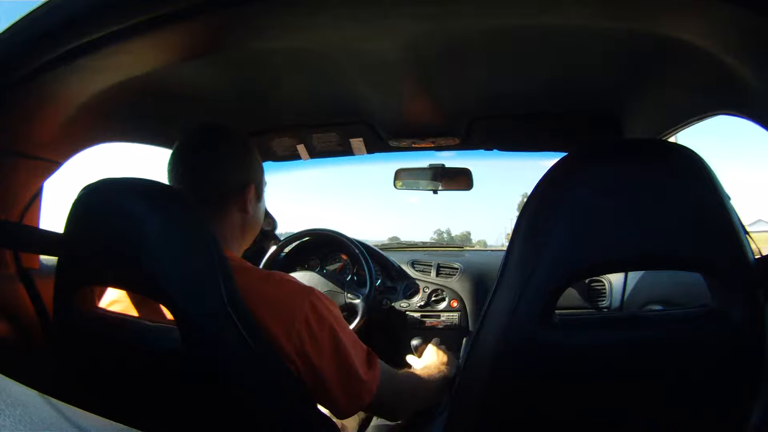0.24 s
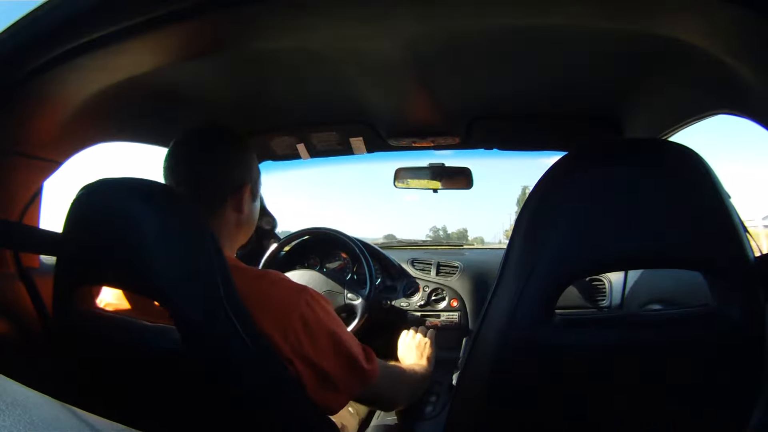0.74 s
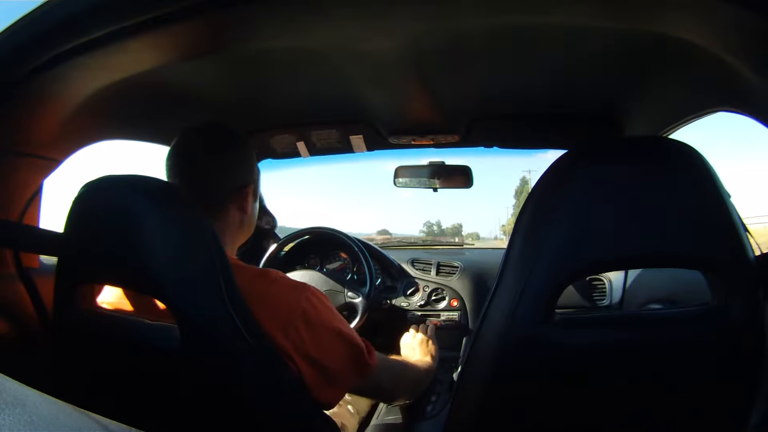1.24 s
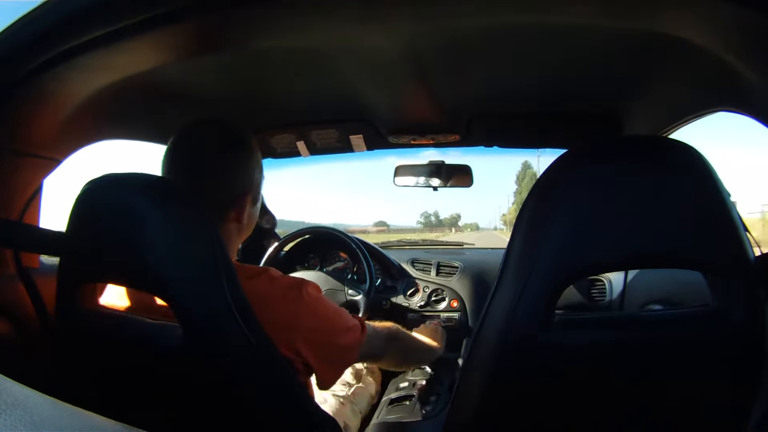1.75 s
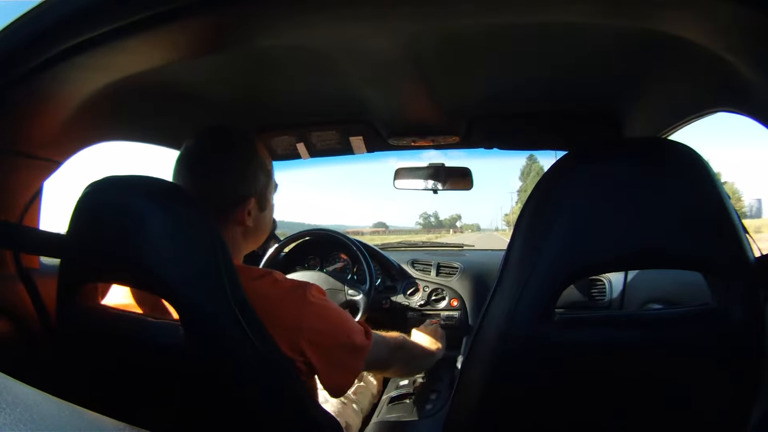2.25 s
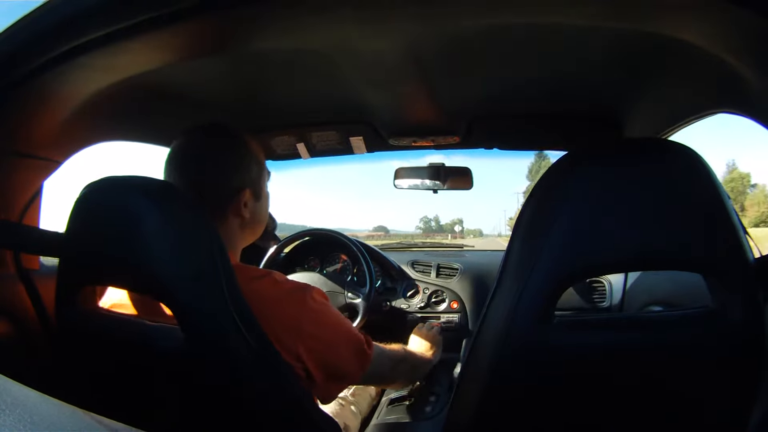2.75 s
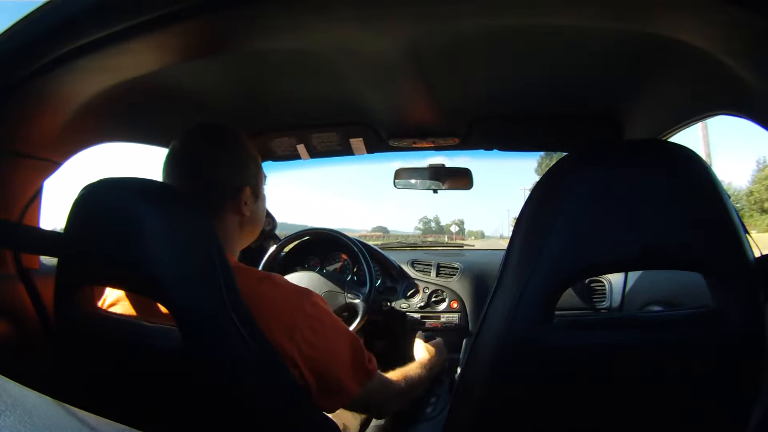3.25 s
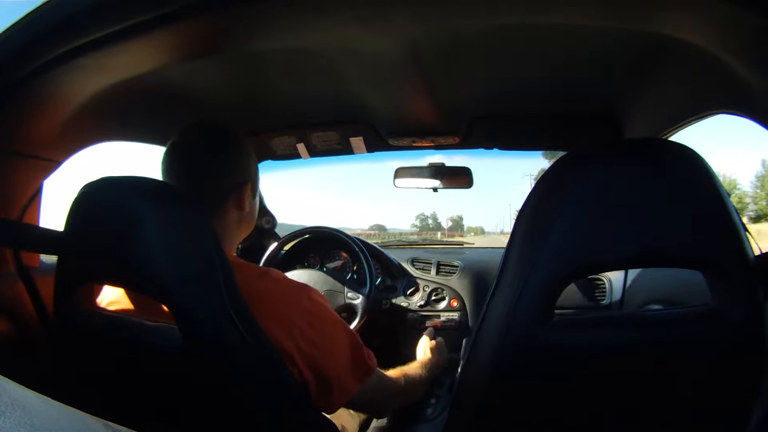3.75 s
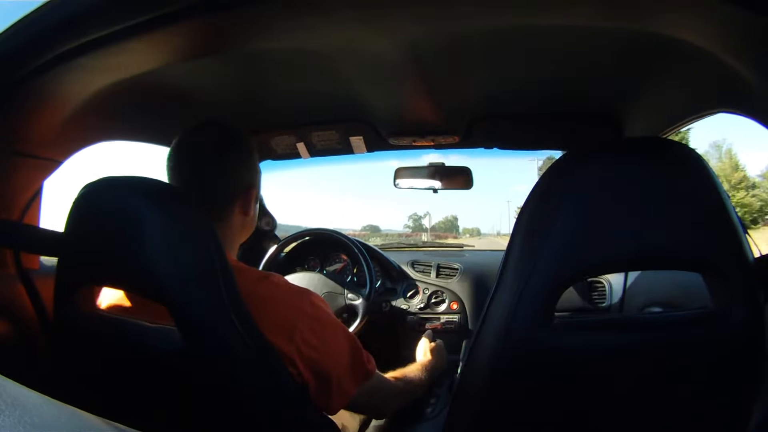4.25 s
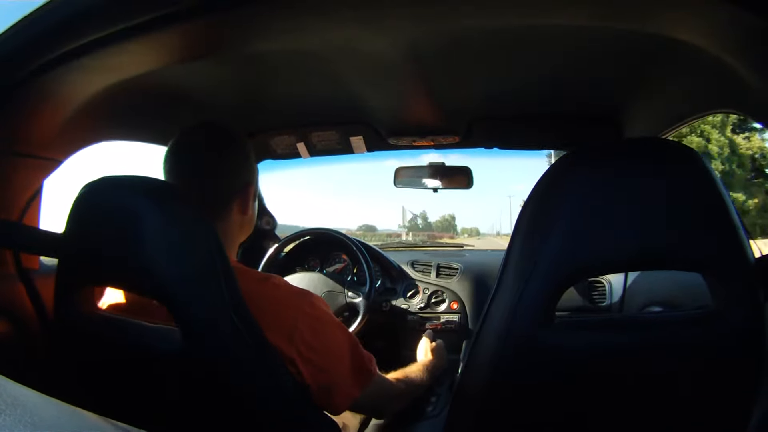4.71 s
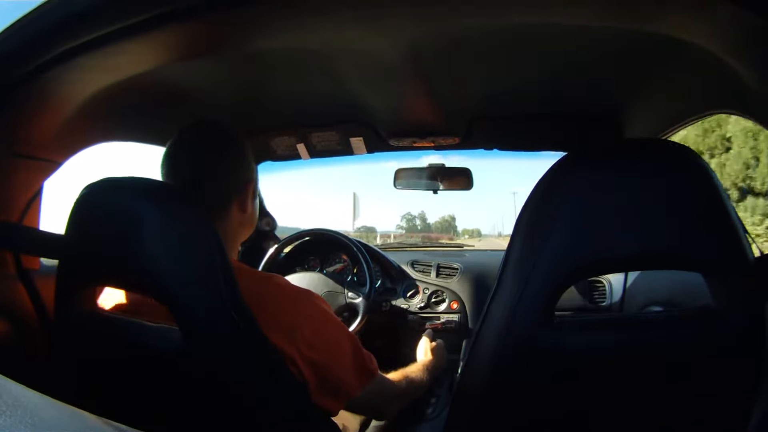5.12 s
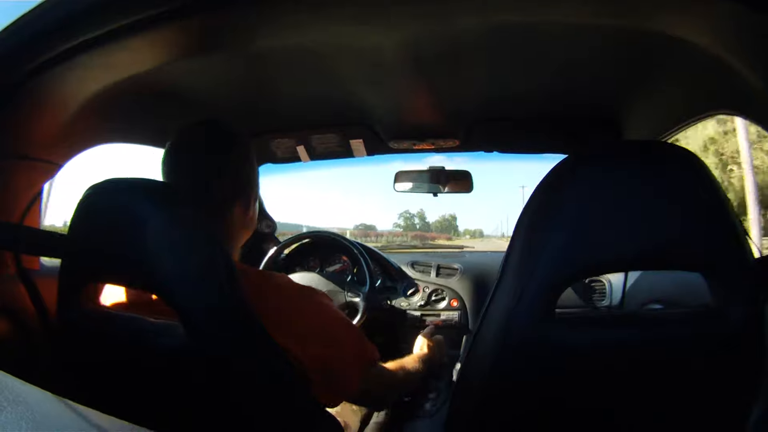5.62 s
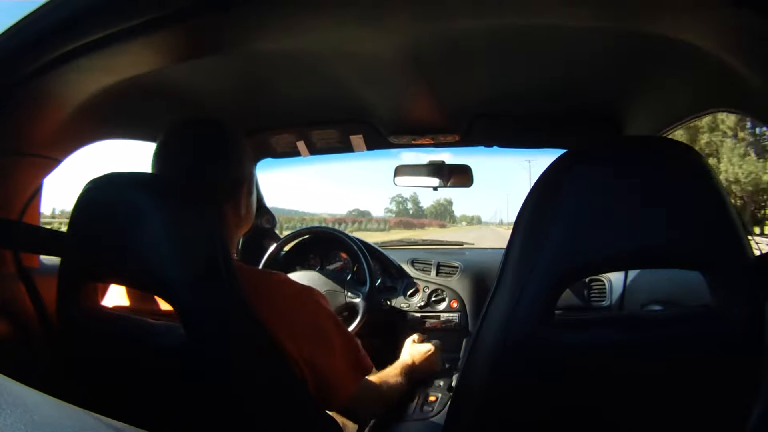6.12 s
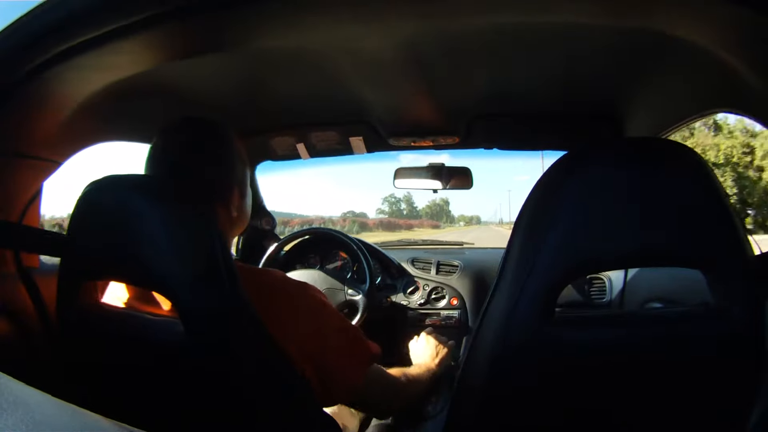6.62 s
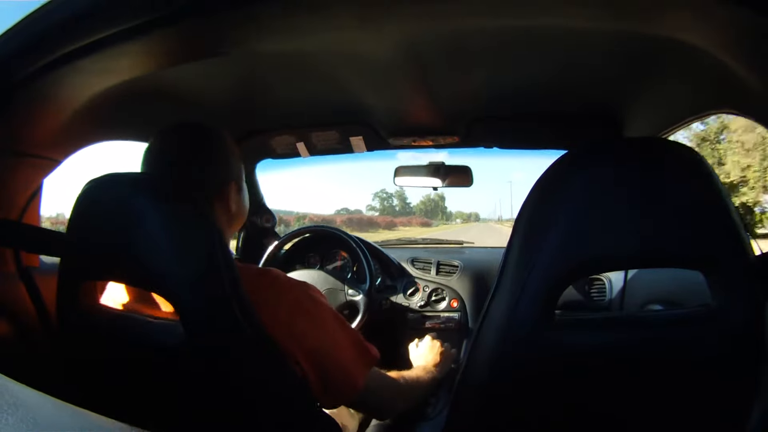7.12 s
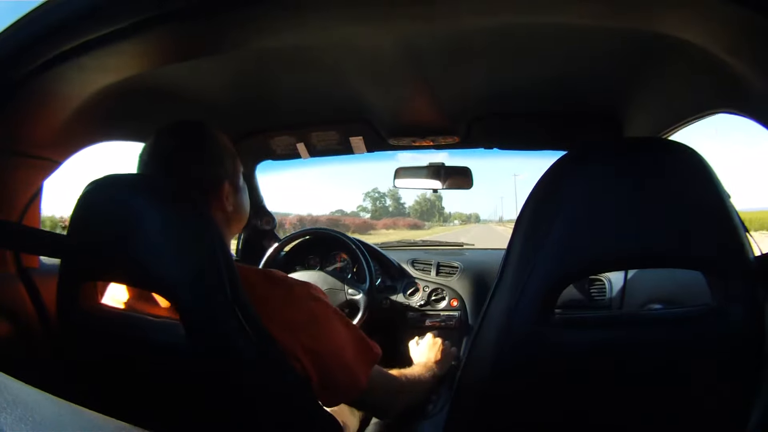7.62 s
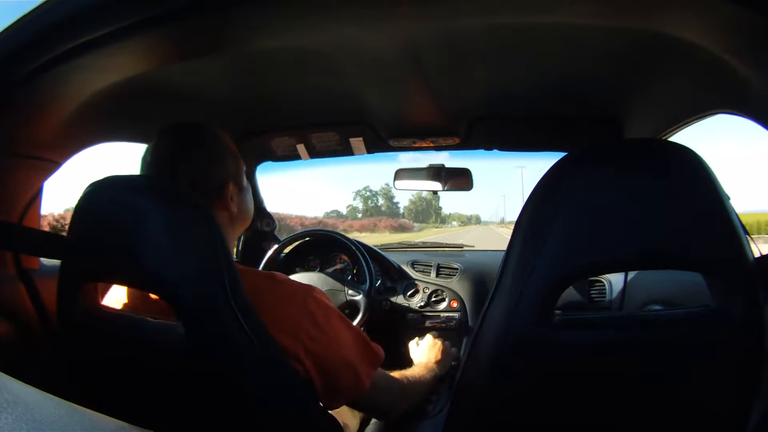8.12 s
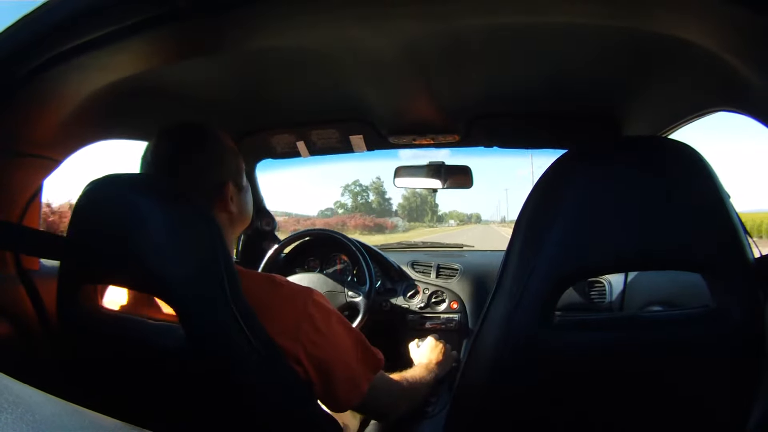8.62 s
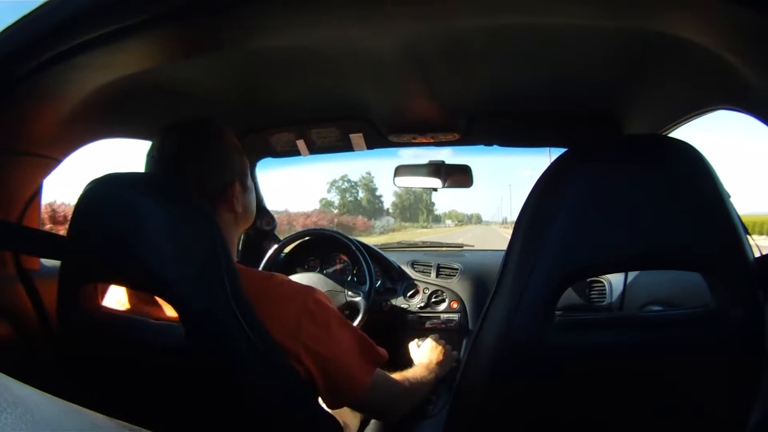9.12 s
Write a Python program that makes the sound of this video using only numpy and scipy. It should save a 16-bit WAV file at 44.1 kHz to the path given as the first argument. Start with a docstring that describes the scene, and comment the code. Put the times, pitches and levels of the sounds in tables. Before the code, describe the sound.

A turbocharged sports car accelerates through two gears and coasts, heard inside, with wind buffeting making everything throb.

```python
"""Inside a car, behind the seats: a turbocharged two-rotor engine pulls through two gears and coasts.
Exhaust pulses drive the resonances of the cabin, gas and turbo hiss, the road rumbles and trim ticks.
Air passing the open windows buffets the cabin so hard that the capsule of a small camera's microphone
responds nonlinearly, and every other sound throbs at the rate of the buffeting."""
import sys
import numpy as np
from scipy import signal
from scipy.fft import rfft, irfft, next_fast_len
from scipy.io import wavfile
from scipy.ndimage import uniform_filter1d

SR = 44100
rng = np.random.default_rng(int(sys.argv[2]) if len(sys.argv) > 2 else 0)


def master_out(mix):
    """Clip the mix to full scale and print it as 16-bit PCM to the path in sys.argv[1]."""
    frames = np.transpose(np.atleast_2d(mix))
    ceiling = np.clip(frames, -1, 1)
    pcm = np.round(ceiling * 32767).astype(np.int16)
    wavfile.write(sys.argv[1], SR, pcm)


N = 412776

# Spectra of road noise, turbo hiss and exhaust gas. Each row: frequency in Hz, relative density in dB.
ROAD_SPECTRUM = [(30, 31.5), (45, 19.5), (70, 9), (110, -0.5), (170, -4), (300, 3.5), (420, -3.5),
                 (700, -7.5), (1100, -8), (1600, -14), (2200, -25), (3200, -43), (5000, -44.5), (9000, -55),
                 (13000, -69.5)]
HISS_SPECTRUM = [(1500, -24), (2200, 2.5), (3000, -4), (4000, -9), (5000, -11.5), (5900, -7.5), (7000, -12),
                 (8500, -11.5), (10000, -17.5), (12000, -21.5), (14000, -25.5), (15500, -37)]
GAS_SPECTRUM = [(90, -23), (150, -15.5), (300, -4.5), (600, 10.5), (1000, 0), (1600, 7), (2200, -7.5),
                (3200, -21.5)]
# Road and wind noise. Each row: time in seconds, level above the low cut in dB.
ROAD_LEVEL = [(0, -29.5), (1.6, -38), (2.3, -45), (3.5, -30.5), (5, -26.5), (5.8, -33.5), (6.2, -38),
              (7.25, -36), (7.6, -38), (8.6, -36.5), (9.36, -39.5)]
# A deep, wavering thrum. Each row: time in seconds, level at the capsule in dB.
THRUM_LEVEL = [(0, -21.5), (1.5, -7.5), (2.5, -13), (4.8, -11), (5.5, -4), (5.8, -12), (6.4, -2.5),
               (7.1, -9.5), (9.36, -9.5)]
# Gear lever and trim impacts. Each row: start in seconds, snap level in dB, knock level in dB.
TICK_EVENTS = [(1.4824, -39, -17.5), (1.6437, -43, -36), (1.7353, -54, -18), (2.1012, -46, -32),
               (2.1066, -62, -11.5), (2.149, -34, -26), (2.164, -50, -19), (2.1763, -58, -38),
               (5.904, -48, -32), (5.9307, -30, -13), (5.9847, -32, -21), (6.0207, -47, -24),
               (6.635, -56, -39), (6.674, -55, -17), (6.7338, -56, -12), (7.1584, -28, -10),
               (7.2212, -28, -12), (7.363, -57, -16), (7.3996, -63, -44), (7.5375, -55.5, -15),
               (7.7777, -55, -19), (7.7938, -68, -9), (8.4407, -56, -29), (8.744, -50, -25),
               (9.0186, -51, -20)]
# Modes of the plastic. Each row: frequency in Hz, time to decay by 60 dB in seconds, gain in dB.
PLASTIC_MODES = [(600, .010, -3), (1200, .005, 0), (1800, .004, -3), (2600, .003, 0), (3700, .0025, 0),
                 (5400, .002, -4), (7500, .002, -10)]
# Compressor speed. Each row: time in seconds, blade-passing frequency in Hz.
BLADE_RATE = [(0, 11250), (.72, 12260), (1.15, 13120), (1.49, 13890), (1.82, 9450), (1.95, 8400),
              (2.08, 7750), (2.25, 7355), (2.36, 7320), (2.68, 9680), (2.91, 10670), (3.28, 11275),
              (4.72, 12180), (5.69, 13210), (5.8, 11500), (6.0, 9335), (6.17, 8180), (6.44, 7470),
              (6.7, 7000)]
# The hiss that stays off throttle. Each row: time in seconds, level in dB.
DRAUGHT_LEVEL = [(1.55, -61), (1.75, -65.5), (1.95, -73), (2.45, -84), (5.8, -60.5), (6, -67), (7.6, -71),
                 (9.36, -72.5)]
# Swells of rumble under load. Each row: centre in seconds, half-width in seconds, peak level in dB.
RUMBLE_SWELLS = [(1.28, 0.14, -25), (3.3, 0.15, -42), (3.65, .04, -24.5), (4.3, 0.25, -43.5),
                 (5.6, 0.19, -30.5)]
# Window buffeting. Each row: central crest in seconds, length in seconds, frequency in Hz, peak in dB.
BUFFET_BOUTS = [(1.062, 0.91, 17.5, 4.5), (1.451, 0.23, 19.1, 12.5), (1.805, 0.47, 20, 12.5),
                (2.305, 0.43, 18.6, 9), (2.726, .38, 19.3, 11), (3.134, 0.44, 20.1, 5.5),
                (3.665, 0.56, 20.7, 9.5), (3.971, .2, 16, 1.5), (4.318, .46, 21.36, 13.5),
                (4.807, .4, 21.4, 11.5), (5.259, 0.55, 22.3, 13), (5.633, 0.26, 16, 4.5),
                (6.005, .54, 23.2, 12.5), (6.581, 0.49, 23.4, 9.5), (7.145, .56, 21.6, 14),
                (7.742, .6, 22.3, 12), (8.297, 0.5, 21, 12), (8.783, .48, 21.8, 13),
                (9.192, .34, 21.8, 11.5)]
# Driving. Each row: clutch bite in seconds, foot lift in seconds, throttle from 0 to 1.
GEAR_SPANS = [(-1, 1.47, 1), (2.12, 5.675, 1), (6.35, 20, 0)]
# The exhaust gulps, murmurs and fades as the clutch opens. Each row: seconds after lifting, gain in dB.
LIFT_ENVELOPE = [(0, 2), (.04, -2), (.075, -30), (.12, -15.5), (.24, -12.5), (.4, -26)]
# Engine speed. Each row: time in seconds, shaft rotation frequency in Hz.
SHAFT_SPEED = [(0, 90.6), (.2, 94.5), (.58, 100.4), (1.05, 108.8), (1.34, 114.3), (1.49, 116.6), (1.6, 107),
               (1.7, 103.5), (2.12, 90), (2.285, 78), (2.37, 81), (2.5, 81.1), (2.79, 83.1), (3.26, 88.4),
               (3.8, 93.5), (4.63, 100.6), (5.7, 109.6), (5.78, 102.5), (5.95, 101), (6.3, 79), (6.5, 77),
               (9.36, 71.5)]
# Harmonics of the exhaust pulse. Each row: order (multiple of shaft speed), base level in dB.
EXHAUST_ORDERS = [(1, -1.5), (2, 1.5), (3, 2), (4, 11.5), (5, 8.5), (6, 14), (7, 8.5), (8, 7), (9, 0.5),
                  (10, 0.0), (11, -0.3), (12, -1.5), (13, -2), (14, -2.5), (15, -6.5), (16, -6.5),
                  (17, -13.5), (18, -18.5), (19, -13), (20, -13.5)]
# Pulse shape while the turbo spools up. Each row: time in seconds, then gains in dB for
# order 2, order 3, order 4, order 6 and the rasp (orders 9, 11, 13 and 17).
SPOOL_SHAPE = [(2.2, -11, 0, -3.5, 13, 0.1), (2.3, 7.5, -13.5, -15, 7, 8), (2.62, 3.5, -9, -16, 11, -1),
               (2.78, -12.5, 2, 2, 9.5, 3), (2.95, -9, 6, -0.5, 11.5, 12.5),
               (3.1, -3.5, 6.5, 2, -8.5, 10.5), (3.25, -1, 3, 1.5, -7.5, 2.5)]
# Cabin and pipe resonances. Each row: frequency in Hz, bandwidth in Hz, gain in dB.
CABIN_MODES = [(186.4, 25.3, -21), (230.3, 17.5, -23), (323.5, 56, -30), (386, 12, -68.5), (449, 33, -47),
               (519.4, 15, -37.5), (565.5, 45, -39.5), (627, 14, -42.5), (701.5, 24.6, -41),
               (796, 25, -59.5), (821.4, 38, -41), (890.4, 31, -37.5), (996.6, 24.4, -30),
               (1039, 19, -34.5), (1119, 18, -41), (1204, 60, -39), (1465.5, 27, -33.5), (1497, 18, -43),
               (1735, 19, -38.5), (1860, 21, -60), (1901, 20, -37.5), (2030, 79, -48)]
# Dead spots of the cabin at the capsule. Each row: frequency in Hz, bandwidth in Hz.
CABIN_NULLS = [(663.5, 24), (414.4, 25)]

FULL_BOOST_HZ, STALL_HZ = 11410, 7300  # blade rates: the engine weakens below one, the whistle the other
LOW_CUT_HZ, TOP_CUT_HZ = 130, 15200


def undb(db):
    """Amplitude ratio of a level in dB."""
    return 10 ** (np.asarray(db) / 20)


def curves(table):
    """Linear interpolation in time: each later column as one value per sample."""
    times, *columns = np.transpose(table)
    return [np.interp(np.arange(N) / SR, times, column) for column in columns]


def walk(rate_hz):
    """Slow random fluctuation of unit deviation: held values, smoothed twice."""
    hold = int(SR / rate_hz)
    steps = np.repeat(rng.standard_normal(N // hold + 1), hold)
    smooth = uniform_filter1d(uniform_filter1d(steps, hold), hold)[:N]
    return smooth / smooth.std()


def noise(spectrum):
    """Spectral shaping of white noise, scaled to rms 1."""
    size = next_fast_len(N)
    hz, db = np.transpose(spectrum)
    log_hz = np.log(np.arange(1, size // 2 + 2) * SR / size)
    gain = undb(np.interp(log_hz, np.log(hz), db, -80, -120))
    shaped = irfft(rfft(rng.standard_normal(size)) * gain, size)[:N]
    return shaped / shaped.std()


def ring(x, hz, width_hz):
    """Forced response of a damped resonator with unit gain at resonance."""
    return signal.lfilter(*signal.iirpeak(hz, hz / width_hz, fs=SR), x)


def low_cut(x):
    """Fourth-order high-pass filtering."""
    return signal.sosfilt(signal.butter(4, LOW_CUT_HZ, "high", fs=SR, output="sos"), x)


def road():
    """Transmission of tyre and wind noise through the shell; lows and highs flicker independently."""
    roar = noise(ROAD_SPECTRUM)
    low = signal.sosfilt(signal.butter(2, 400, fs=SR, output="sos"), roar)
    roar = low * undb(walk(25)) + (roar - low) * undb(1.9 * walk(60))
    return roar / low_cut(roar).std() * undb(curves(ROAD_LEVEL)[0])


def low_thrum():
    """Narrow-band noise: a deep, wavering thrum near 37 Hz."""
    band = ring(ring(rng.standard_normal(N), 37.4, 6.9), 37, 8.1)
    return band / band.std() * undb(curves(THRUM_LEVEL)[0])


def trim_ticks():
    """Damped free vibration of struck plastic: a dull knock and a bright snap that bounce twice."""
    bounce_s, bounce_db = .004, -8
    out, t = np.zeros(N + 4000), np.arange(1000) / SR
    scatter = rng.standard_normal((len(TICK_EVENTS), 3, len(PLASTIC_MODES) + 1))
    # the contact takes a moment to build, longer for the knock
    knock, snap = ((1 - np.exp(-t / rise_s)) ** 2 for rise_s in (.0008, .0002))
    for (start, snap_db, knock_db), contacts in zip(TICK_EVENTS, scatter):
        for bounce, (late, *detunes) in enumerate(contacts):
            at = int((start + bounce * bounce_s * np.exp(0.38 * late)) * SR)
            for (hz, t60, db), detune in zip(PLASTIC_MODES, detunes):
                attack = undb(knock_db) * knock if hz < 2000 else undb(snap_db) * snap
                envelope = attack * undb(db + bounce * bounce_db - 60 * t / t60)
                out[at:at + len(t)] += envelope * np.sin(2 * np.pi * hz * (1 + 0.18 * detune) * t)
    return out[:N]


def buffet_crackle(pressure):
    """A Poisson process: random bright crackle, loudest in the troughs of the buffeting; rms 1."""
    clicks_per_s = 220
    clicks = (rng.random(N) < clicks_per_s / SR) * undb(3.2 * np.minimum(rng.exponential(size=N), 5))
    grains = ring(ring(clicks * np.exp(-0.28 * pressure), 2600, 2400), 2600, 2400)
    return grains / grains.std()


def turbo(throttle, pressure):
    """Flow noise of boost and draught, a crackle that rises with it, and a thin blade-passing tone."""
    hz = curves(BLADE_RATE)[0]
    excess_khz = (hz - FULL_BOOST_HZ) / 1000
    unstalled = np.clip((hz - STALL_HZ) / 200 + 1, 0, 1)
    whistle_rms = (throttle * undb(-85 + 2.4 * excess_khz) + unstalled * undb(-92)) * undb(3.5 * walk(30))
    blade_phase = 2 * np.pi * np.cumsum(hz * (1 + .007 * walk(120))) / SR
    whistle = np.sqrt(2) * whistle_rms * np.sin(blade_phase)
    # buffeting pumps hiss through the window gap; both ends of a strong swing choke it
    pumping = np.exp(-0.019 * pressure - .01 * pressure ** 2)
    hiss = noise(HISS_SPECTRUM) * undb(1.1 * walk(40)) * pumping
    rush = hiss + undb(-5.5) * buffet_crackle(pressure)
    # short of full boost the rush falls off twice as fast
    boost = throttle * undb(-54.5 + 4 * (excess_khz + np.minimum(excess_khz, 0)))
    return rush * np.hypot(boost, undb(curves(DRAUGHT_LEVEL)[0])) + whistle


def low_rumble():
    """Amplitude-modulated noise: a rough low rumble near 140 Hz that comes in swells."""
    t = np.arange(N) / SR
    band = ring(ring(rng.standard_normal(N), 135, 80), 140, 92)
    swells = sum(undb(db) * np.exp(-((t - centre) / width) ** 2) for centre, width, db in RUMBLE_SWELLS)
    return band / band.std() * swells


def window_buffet():
    """Helmholtz resonance: the cabin air bounces on the open windows in overlapping bouts."""
    fade_s = .08
    pressure = np.zeros(N)
    for crest, length, hz, db in BUFFET_BOUTS:
        near = np.arange(int((crest - length) * SR), min(int((crest + length) * SR), N))
        t = near / SR - crest
        envelope = np.clip((length / 2 - abs(t)) / fade_s + .5, 0, 1)
        pressure[near] += undb(db) * envelope * np.cos(2 * np.pi * hz * t)
    return pressure


def throttle_and_load():
    """Throttle from 0 to 1 and load in dB, set by pedal and clutch; successive gears add in power."""
    pedal_s, bite_s, overrun_db = 0.092, 0.052, -12
    t, throttle, power = np.arange(N) / SR, 0, 1e-4
    for bite, lift, pedal in GEAR_SPANS:
        throttle += pedal * np.clip(np.minimum(t - bite, lift + pedal_s - t) / pedal_s, 0, 1)
        bite_db = np.interp(t - bite, [0, bite_s], [-22, 0], left=-80)
        lift_db = np.interp(t - lift, *np.transpose(LIFT_ENVELOPE), left=0, right=-80)
        power += undb(overrun_db * (1 - pedal) + lift_db + bite_db) ** 2
    return throttle, 10 * np.log10(power)


def exhaust_pulses(shaft_hz, angle, throttle):
    """Fourier series of the firings; the orders' phases are spread so each pulse is less spiky."""
    spread_rad = 0.1489  # per order squared
    plain = (0, 0, 0, 0, 0)
    *low_db, rasp_db = curves([(2.05, *plain), *SPOOL_SHAPE, (3.45, *plain)])
    spool_db = dict(zip((2, 3, 4, 6), low_db)) | dict.fromkeys((9, 11, 13, 17), rasp_db)
    uneven_db = 0.24 * (shaft_hz - 100)  # unequal rotors give odd orders that grow with speed
    loss_db_per_order = (1 - throttle) * (4.5 + .45 * np.maximum(100 - shaft_hz, 0))
    pulses = 0
    for order, base_db in EXHAUST_ORDERS:
        db = base_db + order % 2 * uneven_db - loss_db_per_order * max(order - 2, 0)
        drift_db = 1.8 * np.interp(angle, np.linspace(0, angle[-1], 150), rng.standard_normal(150))
        rms = undb(db + spool_db.get(order, 0) + drift_db)
        pulses += np.sqrt(2) * rms * np.cos(order * angle + spread_rad * order ** 2)
    return pulses


def engine(throttle, load_db):
    """Source and filter: two firings a turn, each with a puff of gas, excite the cabin's modes."""
    shaft_hz = curves(SHAFT_SPEED)[0]
    angle = 2 * np.pi * np.cumsum(shaft_hz * (1 + .0012 * walk(30))) / SR
    lag_khz = throttle * np.maximum(FULL_BOOST_HZ - curves(BLADE_RATE)[0], 0) / 1000
    pulses = exhaust_pulses(shaft_hz, angle, throttle)
    gas_db = 6.5 + 0.43 * np.maximum(shaft_hz - 97, 0) - lag_khz - 8 * (1 - throttle)
    puffs = (1 + 0.37 * np.cos(2 * angle - 1)) * noise(GAS_SPECTRUM) * undb(gas_db)
    scatter = undb(.6 * walk(90))  # no two firings are alike
    drive = (pulses * scatter + puffs) * undb(load_db - 3 * lag_khz + 0.18 * (shaft_hz - 105))
    cabin = sum(undb(db) * ring(drive, hz, width) for hz, width, db in CABIN_MODES)
    for hz, width in CABIN_NULLS:
        cabin -= 0.77 * ring(cabin, hz, width)
    return cabin


def scene():
    """Superposition of all sources at the capsule, in one channel."""
    pressure = window_buffet()
    throttle, load_db = throttle_and_load()
    machinery = engine(throttle, load_db) + throttle * low_rumble() + turbo(throttle, pressure)
    return (machinery + road() + low_thrum() + trim_ticks() + pressure)[None]


def record(dry):
    """Intermodulation: the capsule stiffens under pressure, so the buffeting squeezes all else."""
    stiffening, bias, ceiling = 0.098, 3.53, .75  # the bias makes the capsule lean to one side
    bent = np.tanh(stiffening * (dry + bias)) * np.cosh(stiffening * bias) ** 2 / stiffening
    cut = low_cut(bent - bent[:, :1])
    rounded = cut / (1 + (np.abs(cut) / ceiling) ** 4) ** .25  # the preamp rounds the tallest peaks
    return signal.sosfilt(signal.ellip(8, .2, 70, TOP_CUT_HZ, fs=SR, output="sos"), rounded)


dry = scene()
out = record(dry)
master_out(out)
```